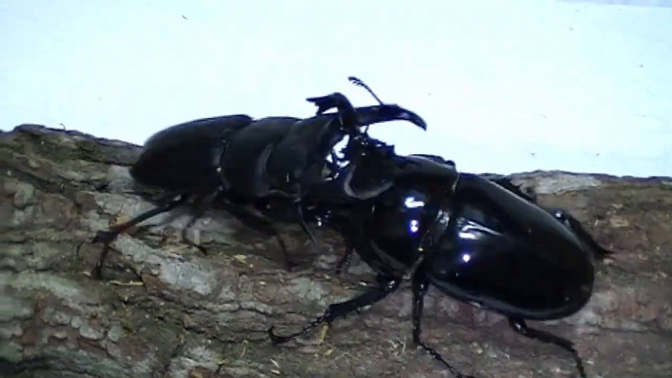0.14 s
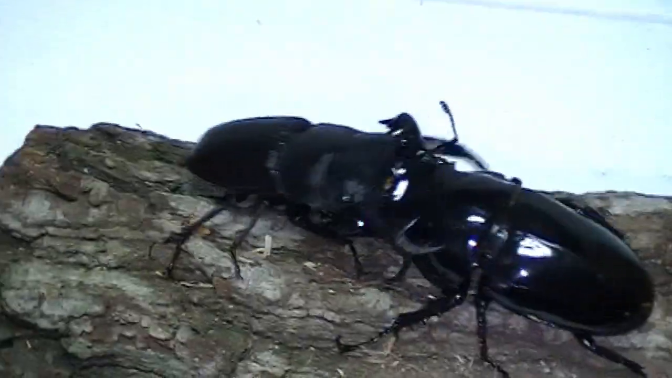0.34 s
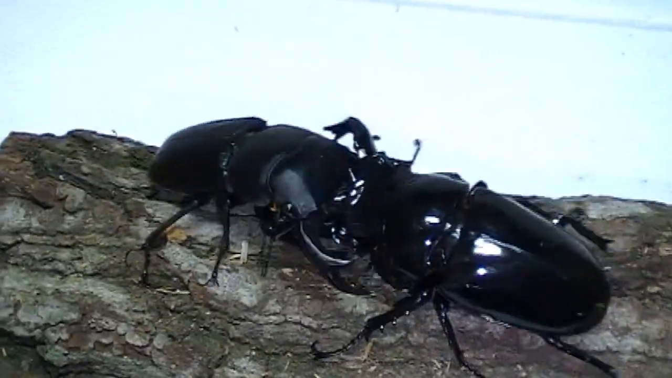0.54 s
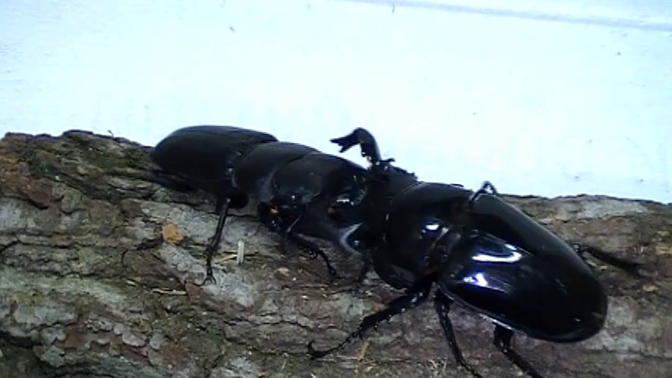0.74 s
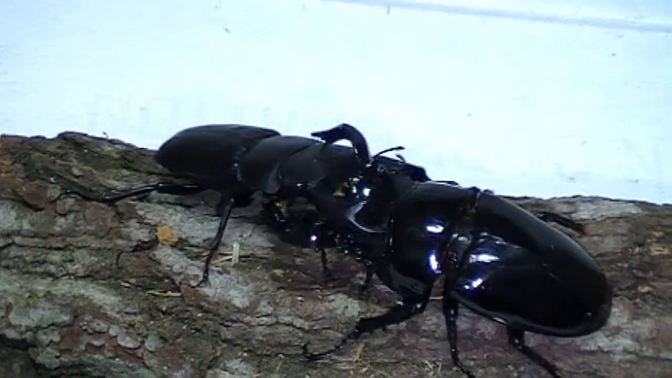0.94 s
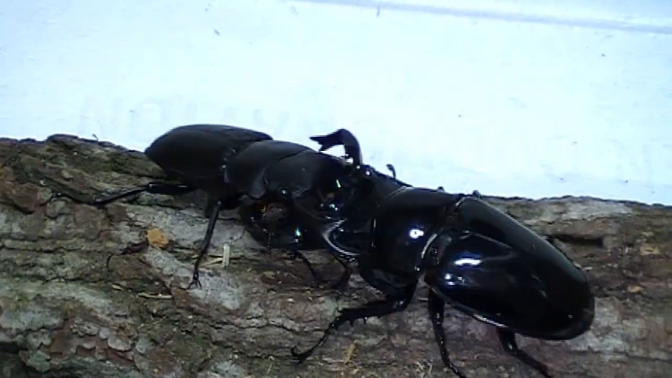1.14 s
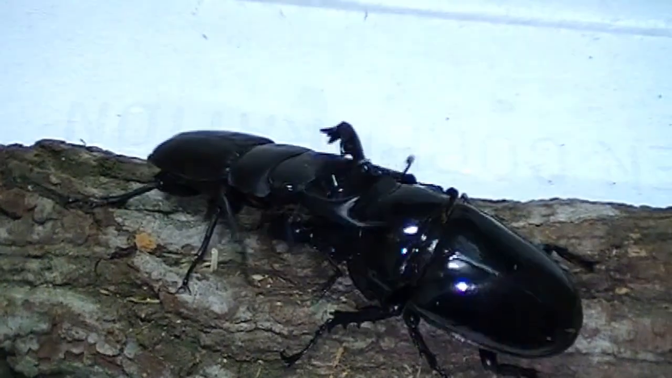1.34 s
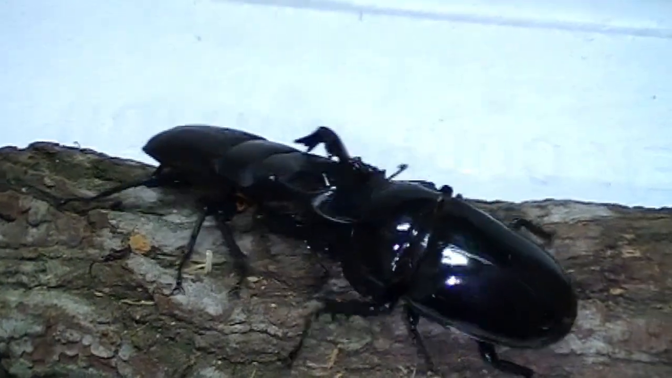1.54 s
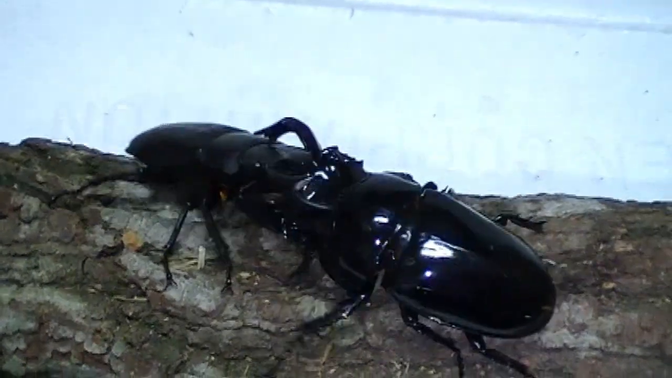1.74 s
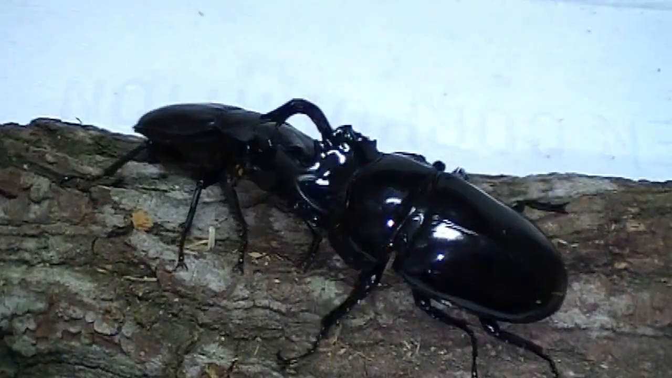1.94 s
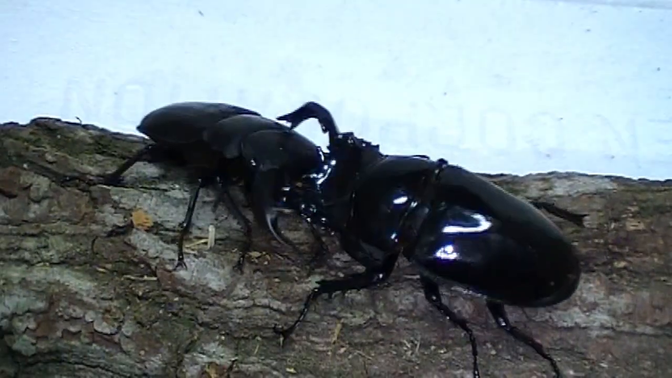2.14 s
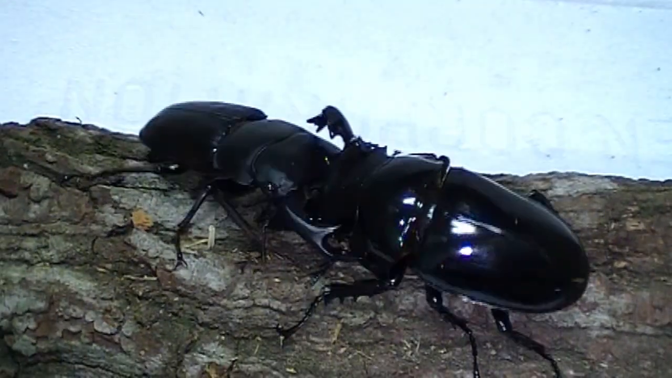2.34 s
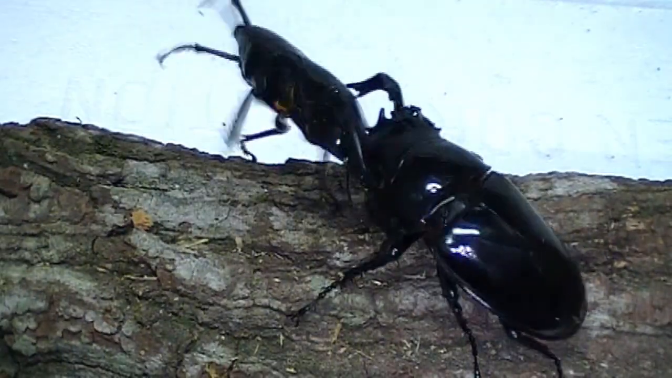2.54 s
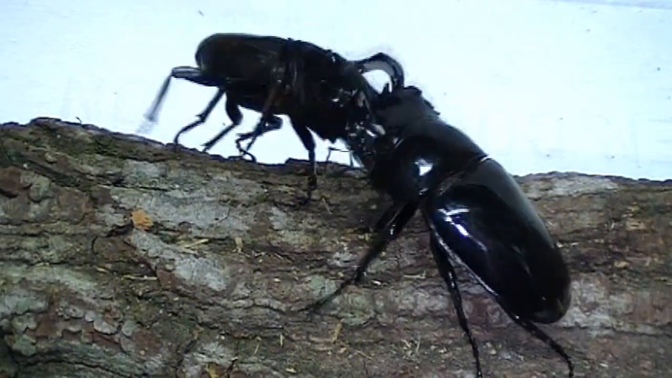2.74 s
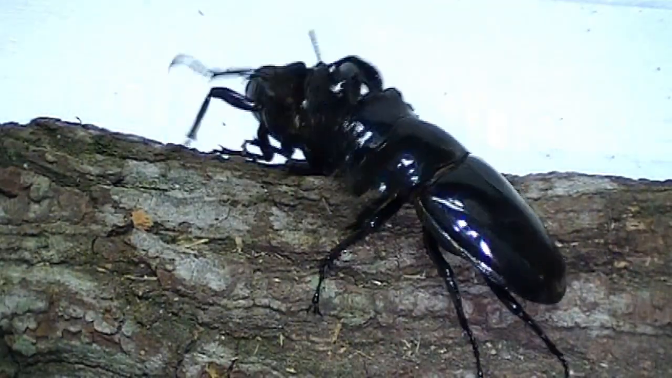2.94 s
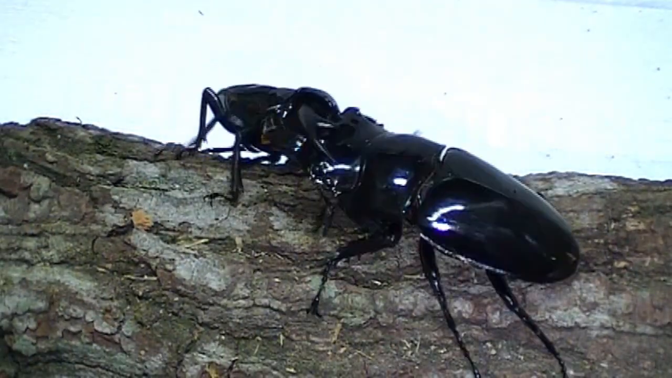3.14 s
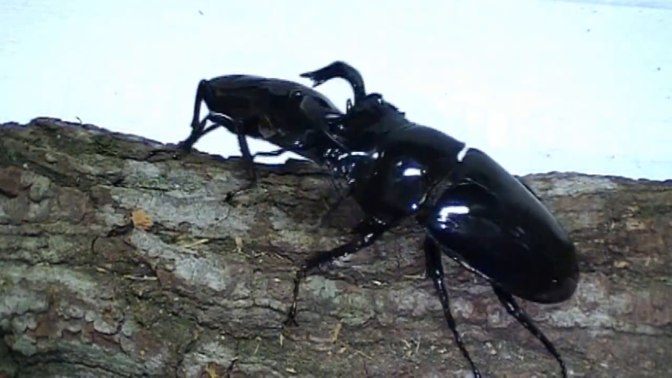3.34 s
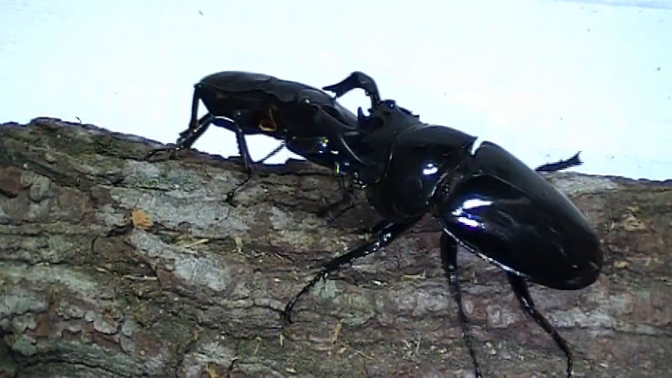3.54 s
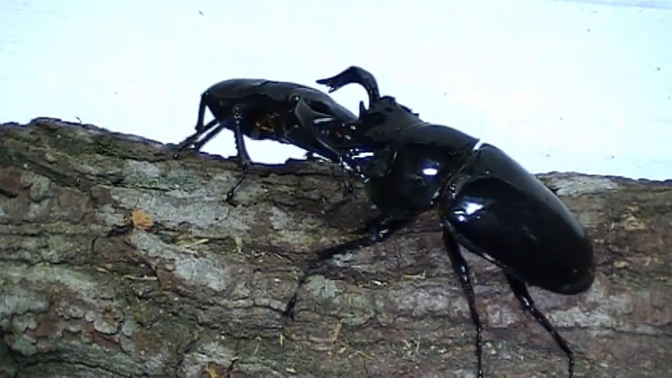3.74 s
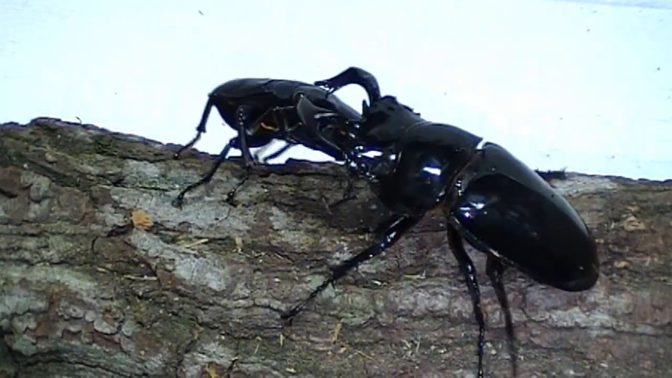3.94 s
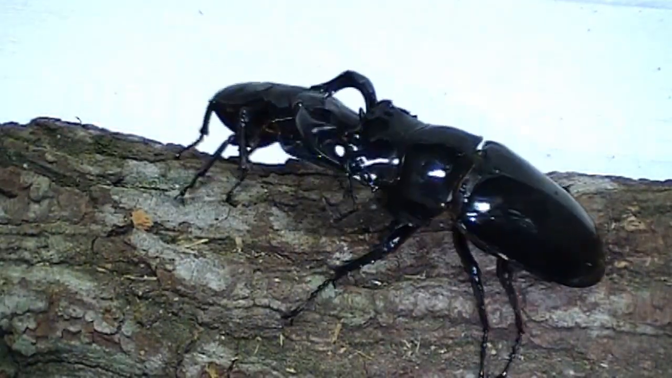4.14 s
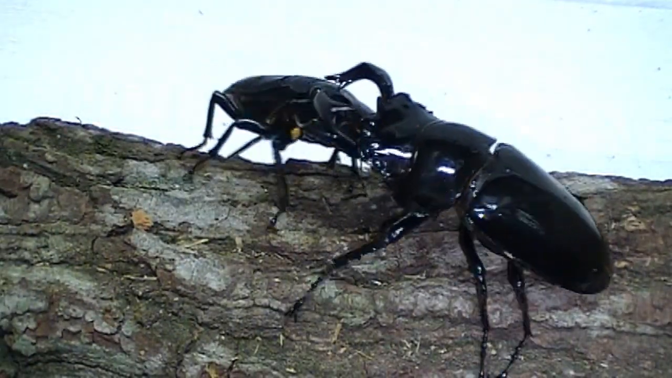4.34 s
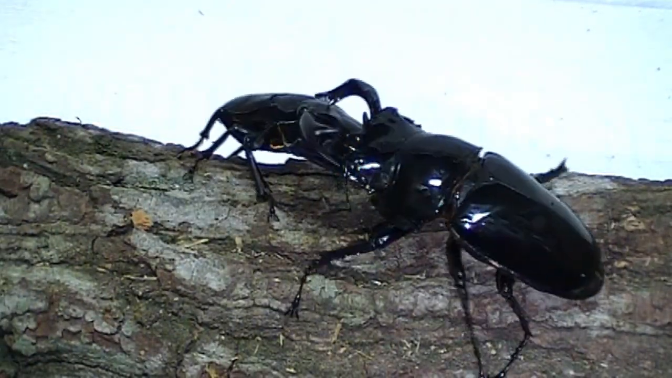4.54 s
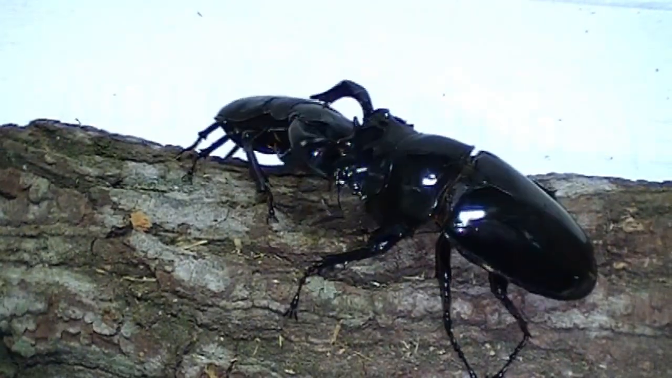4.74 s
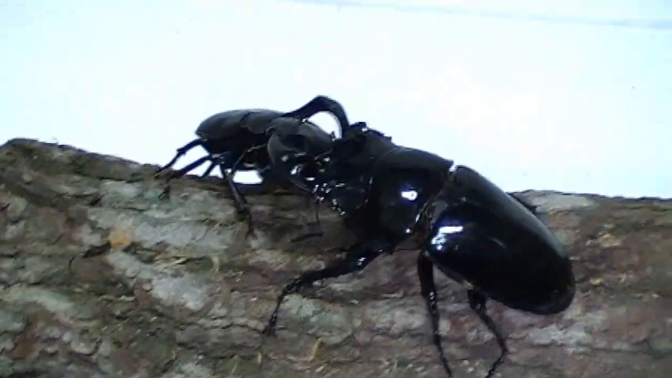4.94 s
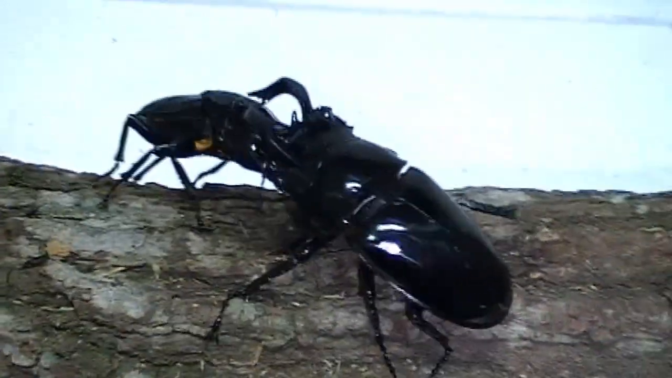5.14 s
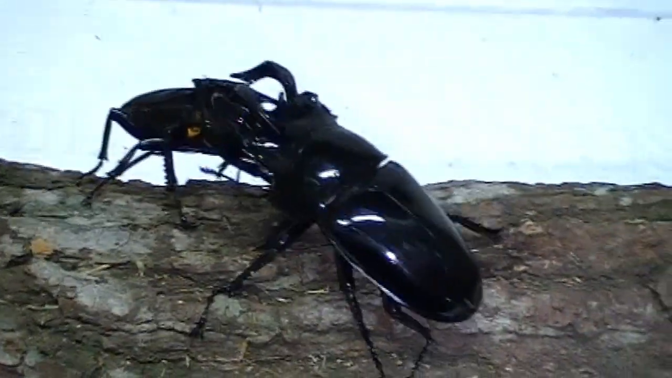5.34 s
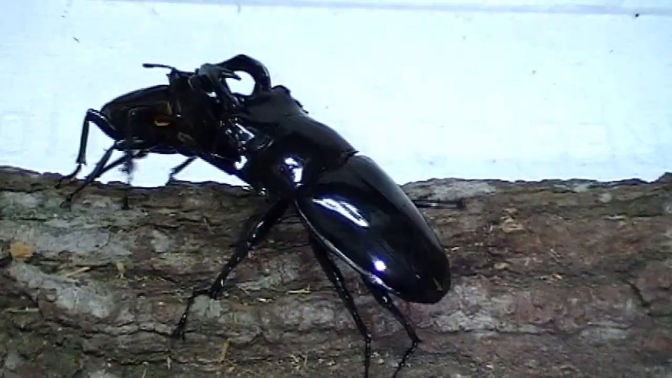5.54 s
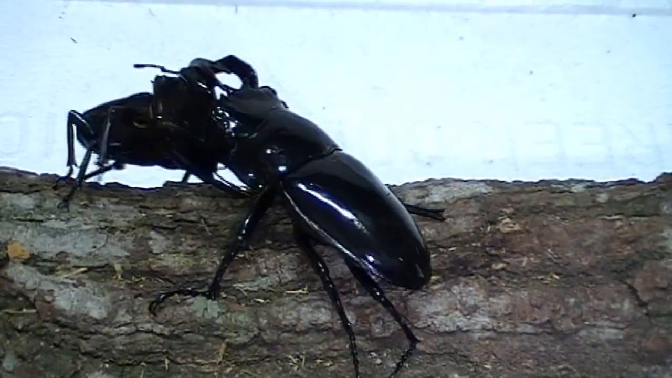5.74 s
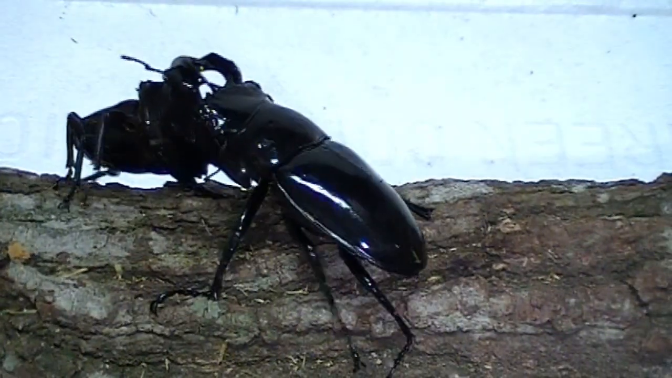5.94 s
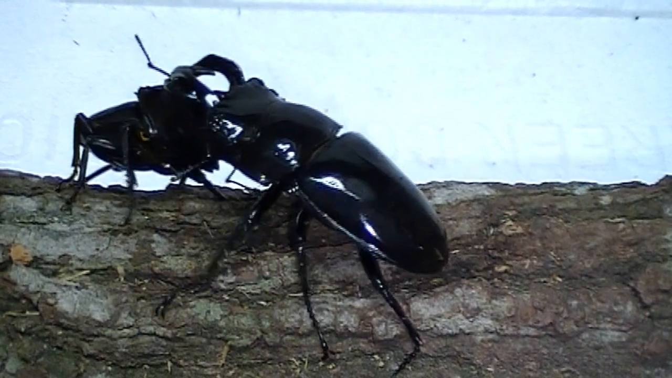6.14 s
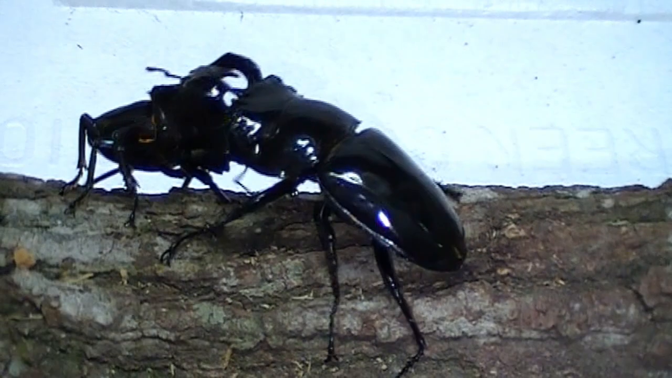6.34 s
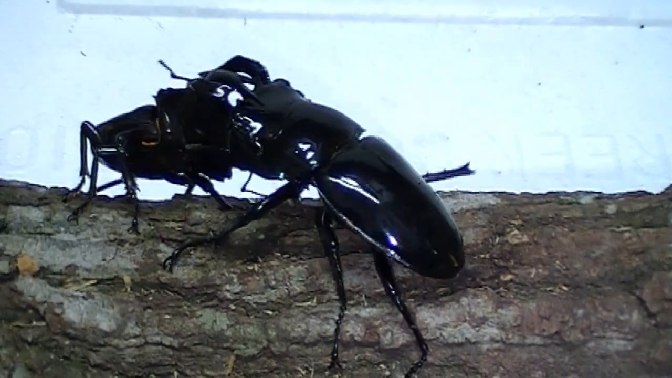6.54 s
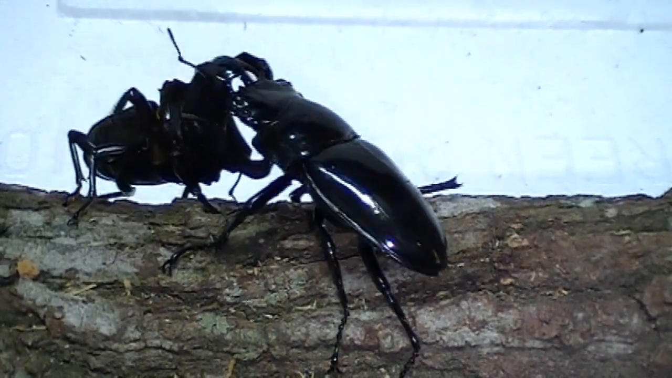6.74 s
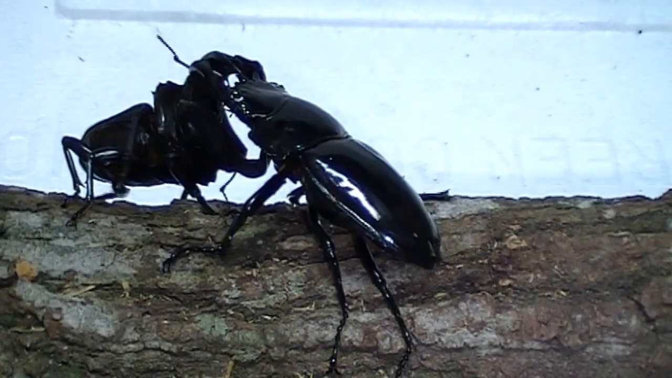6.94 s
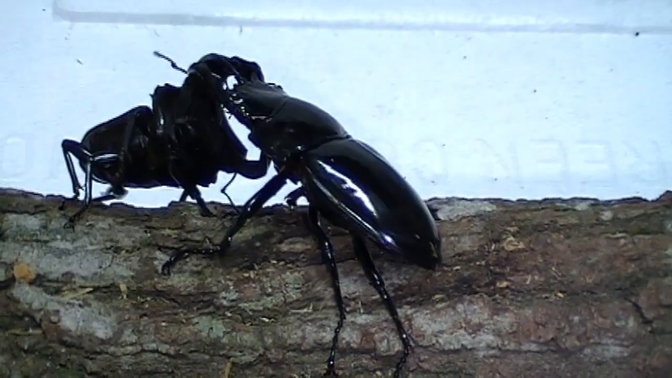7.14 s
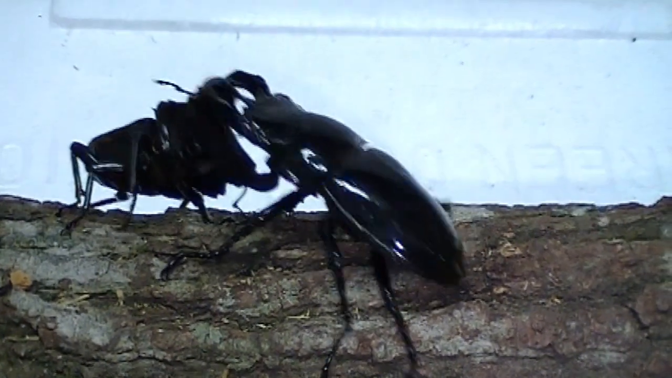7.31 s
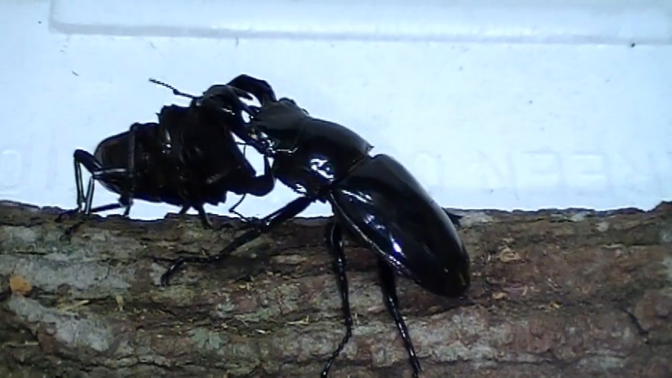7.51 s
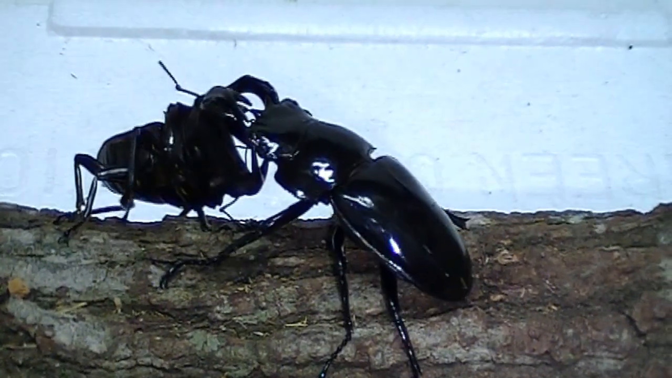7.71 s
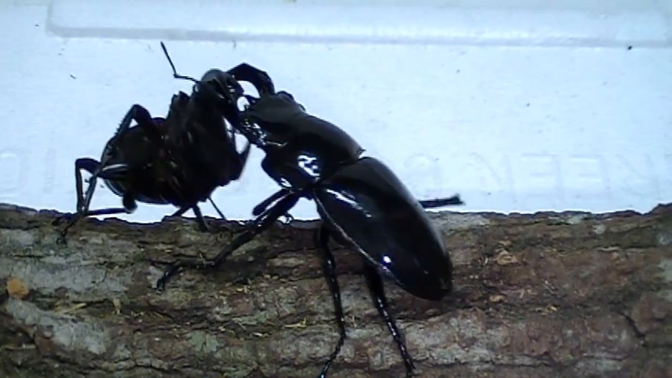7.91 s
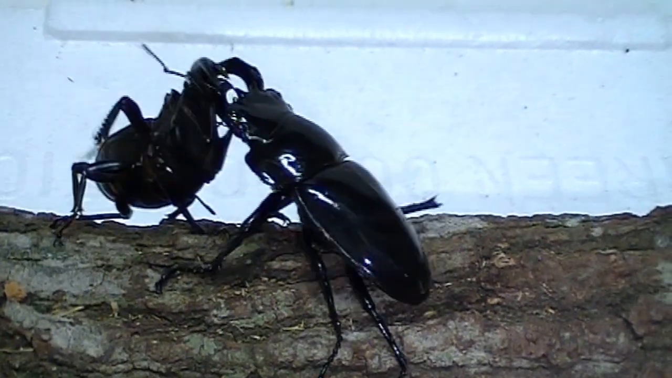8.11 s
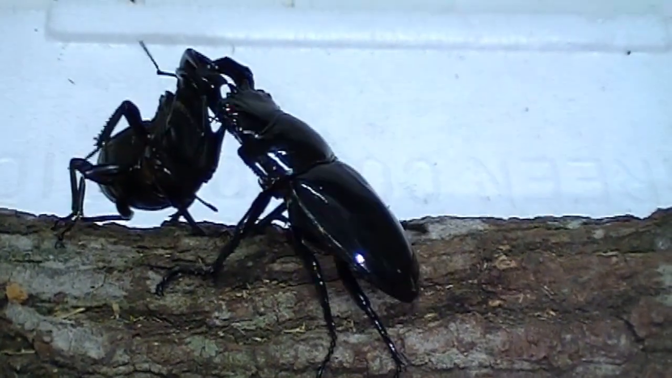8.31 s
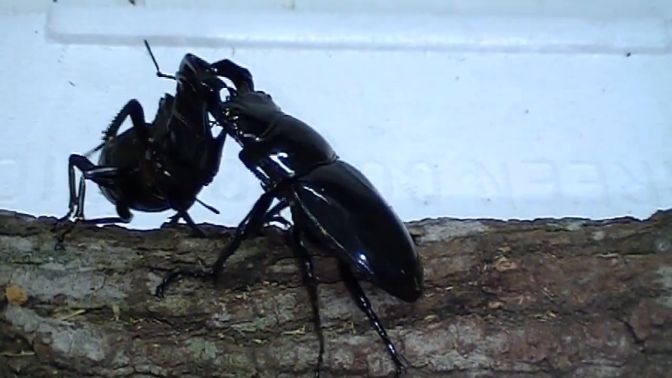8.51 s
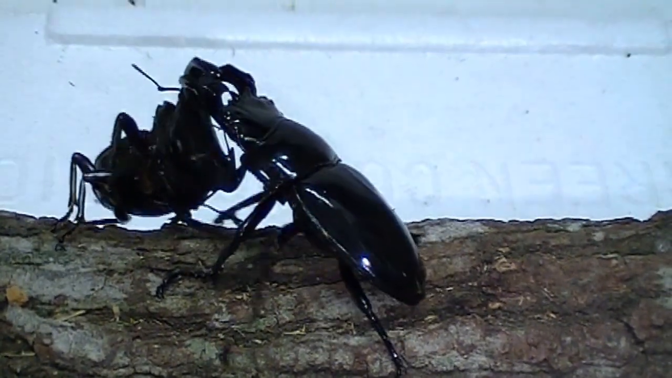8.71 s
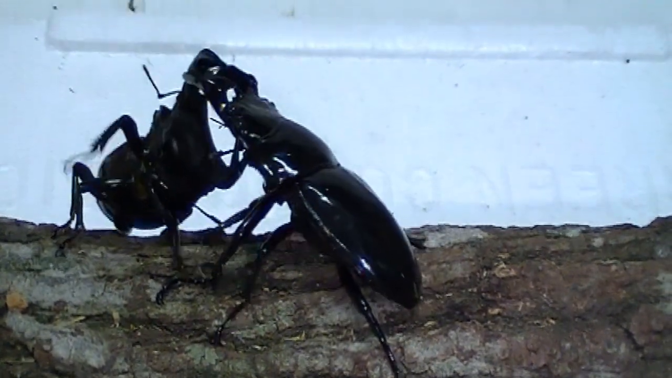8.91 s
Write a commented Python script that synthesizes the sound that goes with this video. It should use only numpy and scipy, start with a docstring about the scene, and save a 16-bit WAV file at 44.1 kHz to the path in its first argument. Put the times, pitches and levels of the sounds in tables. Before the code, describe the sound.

Close, dry insect clicks and crackles in irregular bursts, with small scratches and wood knocks, in a quiet room with a faint low hum.

```python
"""Claws and jaws snap and click, legs scrape, bodies bump and wood knocks as two large beetles wrestle on
a piece of bark inside a foam box, close to a stereo camera microphone, in a quiet room with a faint hum.
Snaps are bursts of noise with short noisy echoes, shaped by resonances of tip, shell and wood; scraping
is random grains through the same resonances, bumps and knocks are damped swings with a rough thud, one
rasp is a swelling grind, and the room is coloured noise with two wavering mains hum tones."""
import sys
import numpy as np
from scipy import signal
from scipy.fft import rfft, irfft, next_fast_len
from scipy.io import wavfile
from scipy.ndimage import uniform_filter1d, map_coordinates

SR = 44100
rng = np.random.default_rng(int(sys.argv[2]) if len(sys.argv) > 2 else 0)


def put_to_file(sound):
    """Save the sound as 16-bit audio at rate SR, in the file named by the first command-line argument."""
    columns = np.atleast_2d(sound).T  # one column per channel
    safe = np.clip(columns, -1, 1)
    whole_steps = np.round(safe * 32767)
    wavfile.write(sys.argv[1], SR, whole_steps.astype(np.int16))


def convert_level_to_amplitude(level_db):
    """Map a level in decibels to its linear amplitude factor."""
    exponent = np.asarray(level_db, float) / 20
    return 10 ** exponent


N = 395577


def unit(x):
    """Normalisation: x scaled to rms 1."""
    return x / np.sqrt(np.mean(x ** 2) + 1e-20)


def wobble(rate):
    """Slow modulation: a smooth curve through random knots, rate of them a second."""
    return map_coordinates(rng.standard_normal(int(N * rate / SR) + 4), [np.arange(N) * rate / SR])


def filtered(x, response):
    """Linear filtering: the spectrum of x times a complex response of frequency."""
    m = next_fast_len(N + 8192)
    return irfft(rfft(x, m) * response(np.fft.rfftfreq(m, 1 / SR)), m)[..., :N]


def coloured(points):
    """Spectral shaping: noise of rms 1 whose spectrum follows the (Hz, dB) points."""
    hz, db = np.transpose(points)
    gain = lambda f: convert_level_to_amplitude(np.interp(np.log(f + 1), np.log(hz + 1), db))
    return unit(filtered(rng.standard_normal(N), gain))


# Noise floor in the sum of the two ports. Each row: frequency in Hz, relative level in dB.
ROOM_SUM = [(16, -44.5), (28, -2.5), (45, -11), (75, -3.5), (165, -4.5), (220, -8), (571, -13),
            (996, -14.5), (1260, -17), (1400, -17), (1650, -17), (4400, -20), (6000, -27.5), (12000, -26),
            (15600, -34.5)]
# Noise floor in the difference of the two ports. Each row: frequency in Hz, relative level in dB.
ROOM_DIFFERENCE = [(16, -31.5), (28, -4), (319, -3.5), (571, -8), (896, -8.5), (1200, -13.5), (1780, -18),
                   (4400, -23.5), (6000, -28.5), (12000, -30), (15600, -40)]
# Mains hum tones. Each row: frequency in Hz, level in dB before the wavering.
HUM_TONES = [(120, -64.5), (180, -75.5)]


def room():
    """Sum-and-difference stereo: the microphone's matrix lifts the difference, so lows are partly out of phase."""
    mid = convert_level_to_amplitude(-61.5 + 0.94 * wobble(3.0)) * coloured(ROOM_SUM)
    side = convert_level_to_amplitude(-55.0 + 0.53 * wobble(3.8)) * coloured(ROOM_DIFFERENCE)
    t = np.arange(N) / SR
    hum = np.zeros(N)
    for hz, db in HUM_TONES:
        level = convert_level_to_amplitude(db - 3.5 + 2.5 * wobble(7.5))
        hum += level * np.sin(2 * np.pi * hz * t + 0.3 * wobble(6))
    return np.array([mid + hum + side, mid + 0.46 * hum - side])


# Resonances of the bark. Each row: centre in Hz, width in Hz, gain in dB.
WOOD_MODES = [(404, 4100, -9.5), (1025, 148, 4.5), (1417, 137, 2.5), (2090, 810, 0.5)]
# Resonances of the beetle's shell. Each row: centre in Hz, width in Hz, gain in dB.
SHELL_MODES = [(3290, 1840, -3.5), (5070, 1370, 2), (7360, 490, 0)]
# Resonances of the sharp tip of claw or jaw. Each row: centre in Hz, width in Hz, gain in dB.
TIP_MODES = [(8960, 5200, -6.5), (11100, 2800, 1), (12630, 3200, -7.5), (14700, 2500, -19.5)]


def ring(modes, scatter_db=0, shift=0):
    """Modal superposition: summed causal resonances, with gains and pitches optionally scattered at random."""
    hz, width, db = np.transpose(modes)
    luck = rng.standard_normal((2, len(modes)))
    gains = convert_level_to_amplitude(db + scatter_db * luck[0])
    hz = hz * np.exp(shift * luck[1])

    def response(f):
        total = 0
        for k in range(len(modes)):
            damping = 1j * f * width[k]
            total = total + (-1) ** k * gains[k] * damping / (hz[k] ** 2 - f * f + damping)
        return total
    return response


def hard(x):
    """Resonant filtering: x heard through tip and shell, at rms 1."""
    return unit(filtered(x, lambda f: ring(TIP_MODES)(f) + 1.05 * ring(SHELL_MODES)(f)))


def slips(rate, spread_db):
    """Stick-slip: tiny hooks let go at random, each an uneven burst of noise partly alike at both ports."""
    grains = (rng.random(N) < rate / SR) * convert_level_to_amplitude(spread_db * rng.exponential(size=N).clip(0, 3))
    decay = convert_level_to_amplitude(-60 * np.arange(SR // 20) / SR / 0.017)  # falls 60 dB in 17 ms
    flare = signal.fftconvolve(grains, decay)[:N]
    return unit(flare * (rng.standard_normal(N) + 0.91 * rng.standard_normal((2, N))))


DRAG_WOOD_DB, DRAG_WOOD_FOLLOWS = -37.5, 0.32  # the wood under a drag grows by this share of its level
# Legs dragging over bark. Each row: start in seconds, length in seconds, level in dB before smoothing.
DRAGS = [(0.0, 0.048, -48.5), (0.099, 0.051, -54.5), (0.964, 0.023, -50), (1.067, 0.057, -55),
         (1.311, 0.082, -56), (1.559, 0.051, -57), (1.802, 0.041, -53.5), (1.849, 0.07, -51.5),
         (1.996, 0.06, -57), (2.041, 0.07, -51), (2.12, 0.15, -63), (5.055, 0.13, -65),
         (2.463, 0.077, -53.5), (2.669, 0.052, -54.5), (3.464, 0.045, -49), (4.265, 0.044, -60),
         (6.599, 0.021, -35.5)]


def drags():
    """Friction excitation: strokes with soft ends, made of dense slips, ring tip and shell and the wood below."""
    bright, dull = np.zeros((2, N))
    for s, length, db in DRAGS:
        at = slice(round(s * SR), round((s + length) * SR))
        bright[at] = convert_level_to_amplitude(db)
        dull[at] = convert_level_to_amplitude(DRAG_WOOD_DB + DRAG_WOOD_FOLLOWS * db)
    bright, dull = uniform_filter1d([bright, dull], size=350, axis=1)
    friction = slips(rate=600, spread_db=2.5)
    woody = unit(filtered(friction, ring(WOOD_MODES)))
    return bright * hard(friction) + dull * woody


TICK_DB, TICK_FOLLOWS = -44, .45  # stray ticks grow with effort by this share
# How hard the feet work on the bark. Each row: time in seconds, effort in dB.
FOOT_EFFORT = [(0.0, -65.5), (1.02, -60), (1.57, -74), (1.96, -63), (2.07, -58.5), (2.36, -68.5),
               (2.92, -79), (3.45, -56.5), (3.6, -69), (4.3, -63), (4.9, -68), (5.1, -62), (5.3, -75),
               (5.45, -88.5), (5.95, -65.5), (7.17, -78), (7.47, -70.5), (8.97, -65)]


def rubbing_feet():
    """Amplitude-modulated friction: stray claws tick and feet rub, both following the effort."""
    effort_db = np.interp(np.arange(N) / SR, *np.transpose(FOOT_EFFORT))
    stray = convert_level_to_amplitude(TICK_DB + TICK_FOLLOWS * effort_db) * hard(slips(rate=6, spread_db=6.0))
    unrest_db = 4.5 * wobble(16)
    rub = convert_level_to_amplitude(effort_db + unrest_db) * slips(rate=260, spread_db=4.0)

    def bodies(f):
        wood = convert_level_to_amplitude(7.5) * ring(WOOD_MODES)(f)
        return wood + convert_level_to_amplitude(-2.5) * ring(SHELL_MODES)(f) + convert_level_to_amplitude(-2) * ring(TIP_MODES)(f)
    return stray + filtered(rub, bodies)


JUDDER_GAP_S = .0019
# Clear snaps of claws and jaws. Each row: time in seconds, strength of the tip in dB (rms over about 5 ms,
# before panning), bluntness in dB (wood over tip).
SINGLE_SNAPS = [(0.011, -31, -19), (0.2597, -47, -6), (0.2661, -37, -13), (0.3261, -41, -8.5),
                (0.493, -41, -10), (0.526, -48, 3), (0.5461, -56, 6), (0.5899, -59.5, 16.5),
                (0.7972, -53, -0.5), (0.864, -55, 5), (0.9097, -44.5, -7.5), (0.9911, -43, -7),
                (1.031, -52.5, -3), (1.0728, -32, -28), (1.1001, -31.5, -14), (1.215, -38.5, -18),
                (1.2279, -52, -11), (1.2778, -49, -9), (1.2915, -54, -20), (1.3035, -35, -11),
                (1.3056, -24, -5.5), (1.328, -38, -16), (1.5618, -40, -9.5), (1.5133, -55, -1),
                (1.5779, -47.5, 1.5), (1.7057, -18.5, -14.5), (1.8231, -39, 0), (1.8534, -29, -13),
                (1.8663, -32.5, -8), (1.9216, -51.5, 4.5), (2.0304, -56, -12), (2.011, -48, -2),
                (2.085, -41, -6), (2.1128, -40, -20), (2.126, -64, 8), (2.153, -50.5, -6),
                (2.1913, -54.5, -3.5), (2.2373, -49, -8), (2.2185, -47.5, 3.5), (2.277, -51.5, -4),
                (2.2825, -43, -5.5), (2.31, -50, -6), (2.4233, -32.5, -3), (2.4389, -27, -5.5),
                (2.4771, -37.5, -2), (2.497, -31.5, -9.5), (2.5632, -28, -15), (2.5664, -21, -16.5),
                (2.614, -18.5, -22), (2.7071, -52.5, -5.5), (2.7153, -49, 0), (2.7651, -18, -19.5),
                (2.8025, -49, 0), (2.8542, -49, -3), (2.9476, -51.5, -14), (2.8213, -34, -19.5),
                (2.8432, -43, -3), (3.088, -58.5, 9.5), (3.25, -47.5, -9), (3.264, -41, -10),
                (3.2873, -53, -4), (3.3164, -52, -1), (3.401, -36, -5), (3.4646, -38, -11),
                (3.5171, -48, 3), (3.5944, -49, -9), (3.672, -69, 20.5), (3.801, -45, -12),
                (4.087, -41, -19), (4.2377, -53, -3.5), (4.4951, -57.5, 5), (4.5717, -58, 5),
                (4.6414, -54, -1), (4.2694, -45, -8.5), (4.31, -54.5, 2), (4.5276, -52, -16),
                (4.6951, -39.5, -9.5), (4.7754, -48, -3), (4.8386, -48, -6), (4.8869, -53.5, -7),
                (4.9328, -50, -14), (4.963, -36, 1.5), (4.9957, -51, -1), (5.0135, -32, -14.5),
                (5.0361, -39.5, -13), (5.0468, -38, -19), (5.0945, -46.5, 0), (5.1233, -53.5, -19),
                (5.1377, -51, 11), (5.157, -43.5, -21), (5.186, -52.5, 2), (5.2385, -48, 1.5),
                (5.244, -36.5, -6.5), (5.267, -40.5, -5), (5.2752, -42.5, -2), (5.3208, -24, -3),
                (5.286, -54.5, 3), (5.365, -41.5, -17), (5.3834, -55, 9), (5.4046, -18.5, -16),
                (5.447, -44, -16), (5.5112, -41.5, -67), (5.665, -26.5, -15), (5.7662, -33, -17.5),
                (5.7915, -46.5, -3), (5.8056, -29, -29), (5.816, -46, -20), (5.8259, -38, -16),
                (6.222, -62, 9), (6.2334, -37, -11), (6.4139, -55.5, 5), (6.327, -58.5, 24.5),
                (6.3368, -18, -12.5), (6.5971, -29, -16), (6.6047, -22, -17), (6.656, -48.5, -3),
                (6.7163, -48.5, -1), (6.7885, -46, -3), (6.9452, -38, -4), (7.315, -45, -3),
                (7.42, -50, -8), (7.563, -54, 4), (7.5357, -37.5, 2), (7.5877, -49.5, 5), (7.6037, -35, -8),
                (7.672, -47, -12), (7.7, -52, 3.5), (7.841, -29.5, -11.5), (7.863, -61, 14),
                (7.8786, -47.5, 7.5), (7.8888, -50, -14), (7.9077, -30.5, -41), (7.9249, -55, -5),
                (7.959, -51.5, 8.5), (7.972, -32.5, -18), (8.0851, -48.5, 2.5), (8.201, -54.5, 6),
                (8.6182, -46.5, -12), (8.8159, -56, 5), (8.625, -43.5, -10), (8.845, -36, -9),
                (8.858, -44, -25), (8.909, -31, -13), (8.931, -49, -2), (8.9505, -50.5, 0.5)]
# A jaw juddering along a hard edge, a quick run of snaps. Each row: start in seconds, length in seconds,
# mean strength in dB, bluntness in dB.
JUDDER_RUNS = [(1.3685, .003, -35.5, -11), (2.4863, .0125, -36.5, -12), (5.703, 0.0056, -32.5, -13.5)]


def contacts():
    """Repeated impact: single snaps, and judder runs with slightly uneven timing and strength."""
    runs = []
    for s, length, db, blunt_db in JUDDER_RUNS:
        for at in np.arange(0, length, JUDDER_GAP_S):
            late = JUDDER_GAP_S * rng.uniform(0.024, 0.17)
            runs.append((s + at + late, db + 0.76 * rng.standard_normal(), blunt_db))
    return SINGLE_SNAPS + runs


LEAD_S = .002  # faint contact before a snap


def blow(db):
    """Impulsive excitation: a faint lead-in and a crack, then ragged rattle, box echoes and a room tail."""
    t = np.arange(4096) / SR
    noise = rng.standard_normal((5, len(t)))
    after = t >= LEAD_S
    lead_in = convert_level_to_amplitude(-26.5 - 13 * (1 - t / LEAD_S))
    crack = np.where(after, convert_level_to_amplitude(-60 * (t - LEAD_S) / 0.00058), lead_in) * noise[0]
    crack = crack / np.linalg.norm(crack) * convert_level_to_amplitude(noise[1, :2, None])  # ports differ a little in level
    ragged = convert_level_to_amplitude(3.0 * unit(uniform_filter1d(noise[1], size=40)))
    crumbs = convert_level_to_amplitude(2.3 * unit(uniform_filter1d(noise[2], size=130)))  # bark keeps crackling unevenly
    rattle_db = -17.0 - 0.45 * (db + 27.0)  # hard snaps are cleaner, soft ones blunter
    rattle = ragged * convert_level_to_amplitude(rattle_db + 2.0 - 60 * t / 0.02)
    tail = crumbs * (convert_level_to_amplitude(rattle_db - 15 - 60 * t / 0.046) + convert_level_to_amplitude(-42.5 - 60 * t / 0.17))
    return crack + after * (rattle + tail) * (0.35 * noise[0] + noise[3:])  # partly different at each port


def causal(gain):
    """Minimum phase: the promptest causal response with this gain, by folding its cepstrum."""
    fold = irfft(np.log(gain + 1e-9))
    half = len(fold) // 2
    fold[1:half], fold[half + 1:] = 2 * fold[1:half], 0
    return np.exp(rfft(fold))


SHELL_DB, SHELL_FOLLOWS = -1, 0.49  # the shell rings under the tip and takes this share of the bluntness
# the bare crack, broad from bass to treble, stands out more in hard snaps, less in the sharpest
BARE_DB, BARE_GROWS, BARE_FOLLOWS = -8, 0.16, 0.33


def snaps():
    """Impact on coupled bodies: a blunter snap drives shell and wood more against the tip; powers add."""
    out, hz = np.zeros((2, N + SR)), np.fft.rfftfreq(4096, 1 / SR)
    small = 1 / (1 - 1j * 7000 / (hz + 1)) ** 2  # the tiny tip radiates no lows
    thin = 1 / (1 - 1j * 550 / (hz + 1)) ** 2  # nor does the thin bark
    bare = 1 / (1 + 1j * hz / 7500) / (1 - 1j * 200 / (hz + 1))
    lead = round(LEAD_S * SR)
    for s, db, blunt_db in contacts():
        shell_db = db + SHELL_DB + SHELL_FOLLOWS * blunt_db
        bare_db = db + BARE_DB + BARE_GROWS * (db + 17.5) + BARE_FOLLOWS * min(blunt_db, 0)
        dbs = np.array([db, shell_db, db + blunt_db, bare_db])
        tip = small * ring(TIP_MODES, 2.5, .05)(hz)
        shell = ring(SHELL_MODES, 2.5, .08)(hz)
        wood = thin * ring(WOOD_MODES, 2.5, .03)(hz)
        bodies = np.array([tip, shell, wood, bare])
        push = rfft(blow(max(dbs[:3])))
        # set each body's level by its rms from 1 ms before to 4 ms after the crack
        rung = irfft(push * bodies[:, None])
        onset = rung[:, :, lead - SR // 1000:lead + SR // 250]
        gains = convert_level_to_amplitude(dbs) / np.sqrt(np.mean(onset ** 2, axis=(1, 2)))
        together = causal(np.sqrt(gains ** 2 @ np.abs(bodies) ** 2))
        out[:, round(s * SR):][:, :rung.shape[2]] += irfft(push * together)
    return out[:, lead:N + lead]  # cracks, not lead-ins, fall on the listed times


THUD_DB = 6  # start of the rough noise push over the swing, before the wood filters it
# Bumps and wood knocks, dull to bright. Each row: start in seconds, swing level in dB before damping, onset
# and panning, pitch in Hz.
BUMPS_AND_KNOCKS = [(0.096, -46.5, 454), (0.535, -45.5, 312), (1.3174, -27, 1780), (1.798, -30.5, 900),
                    (1.86, -41, 98.5), (1.897, -29, 910), (2.003, -35.5, 690), (2.522, -48.5, 90.2),
                    (2.98, -47.5, 453), (3.21, -40.5, 460), (4.859, -42, 109), (4.86, -35, 866),
                    (7.221, -45, 337), (7.221, -46, 864)]


def bumps_and_knocks():
    """Damped oscillation: one dying swing, low or knock-like, with a rough thud of the wood on top."""
    swings, push, t = np.zeros(N + SR), np.zeros(N + SR), np.arange(SR // 5) / SR
    for s, db, hz in BUMPS_AND_KNOCKS:
        damping = convert_level_to_amplitude(db - 60 * t * hz / 18)  # falls 60 dB in 18 cycles
        swing = damping * np.sin(2 * np.pi * hz * t) * (1 - np.exp(-t / 0.001))
        swings[round(s * SR):][:len(t)] += swing
        rough = convert_level_to_amplitude(db + THUD_DB - 60 * t / 0.13) * rng.standard_normal(len(t))
        push[round(s * SR):][:len(t)] += rough
    thud = filtered(push[:N], lambda f: ring(WOOD_MODES)(f) / (1 + 1j * f / 1200) ** 3)
    return (swings[:N] + thud) * np.array([[1.2], [.7]])


RASP_S, RASP_LENGTH_S, RASP_DB = 3.47, 0.014, -27.5  # one jaw grinds hard across the other's shell


def rasp():
    """Continuous friction: a swelling grind, too dense for single slips, in upper shell and lowest tip modes."""
    size = round(RASP_LENGTH_S * SR)
    noise = rng.standard_normal((3, N))

    def body(f):
        modes = ring(SHELL_MODES[1:] + TIP_MODES[:1])(f)
        return modes / (1 + 1j * f / 12000) / (1 - 1j * 3500 / (f + 1)) ** 2
    grind = unit(filtered(2 * noise[0] + noise[1:], body))
    swell = np.zeros(N)
    swell[round(RASP_S * SR):][:size] = convert_level_to_amplitude(RASP_DB) * np.hanning(size)
    return swell * grind


def scene():
    """Superposition: all sources add, panned a little to the left by level difference."""
    mix = room() + drags() + rubbing_feet() + snaps() + bumps_and_knocks() + rasp()
    return mix * convert_level_to_amplitude([[.8], [-.8]])  # dB, left and right


def roll_off(x):
    """The treble ends steeply here."""
    return signal.sosfilt(signal.butter(12, 17060, fs=SR, output="sos"), x)


def record(dry):
    """Band-limiting and saturation: the treble is cut off steeply near 16 kHz, the peaks clip at full scale."""
    band_limited = filtered(dry, lambda f: 1 / np.sqrt(1 + (f / 16000) ** 70))
    return roll_off(np.clip(band_limited, -1, 1))


dry = scene()
out = record(dry)
put_to_file(out)
```